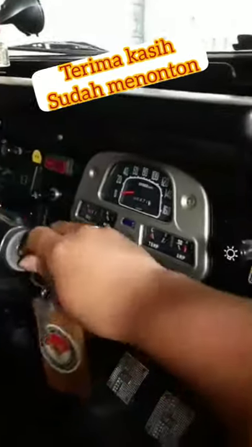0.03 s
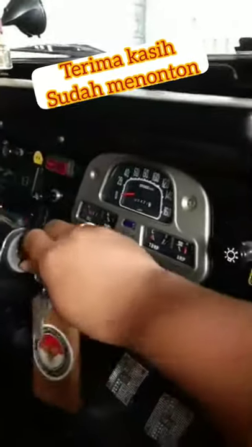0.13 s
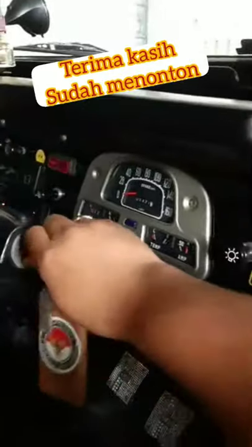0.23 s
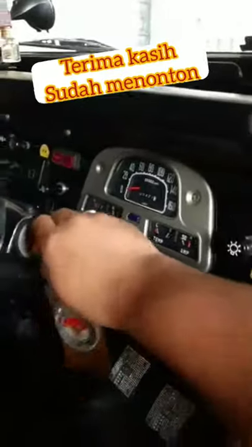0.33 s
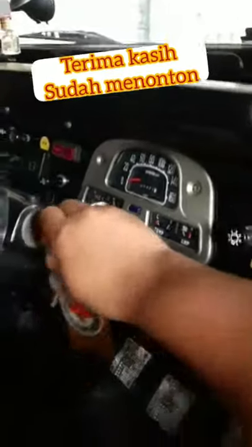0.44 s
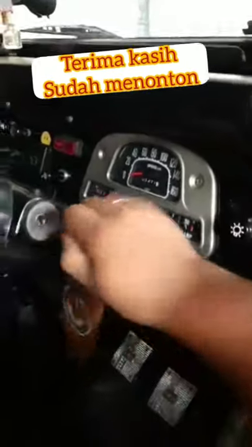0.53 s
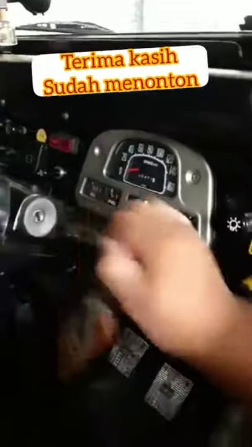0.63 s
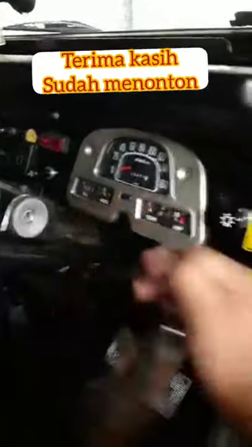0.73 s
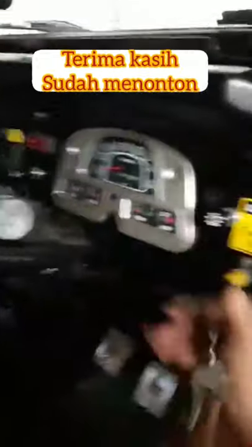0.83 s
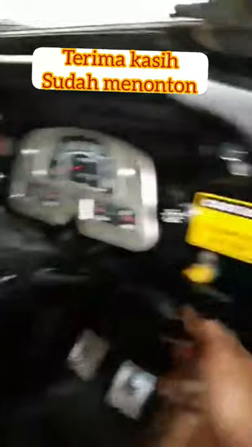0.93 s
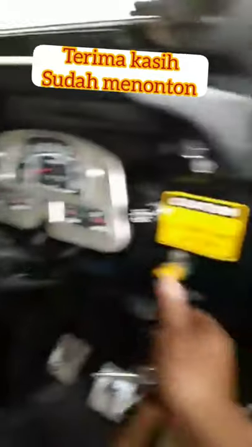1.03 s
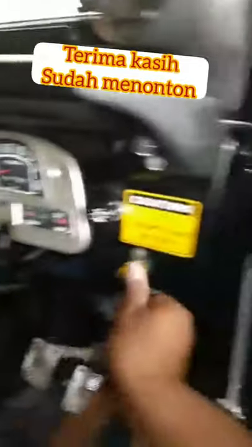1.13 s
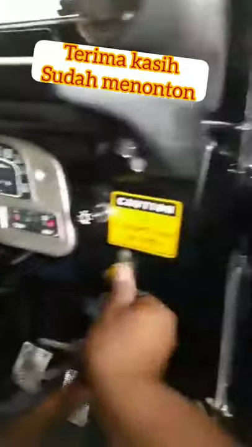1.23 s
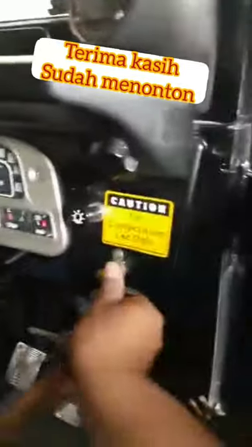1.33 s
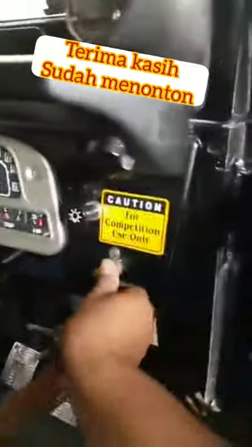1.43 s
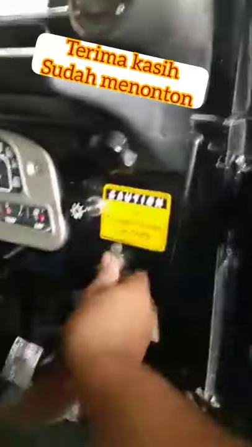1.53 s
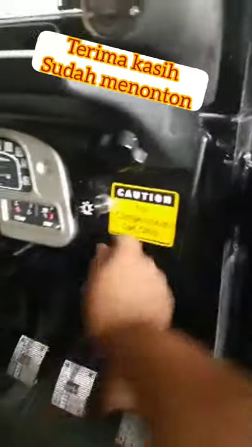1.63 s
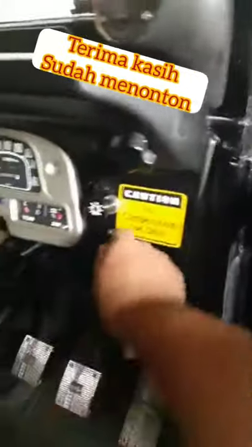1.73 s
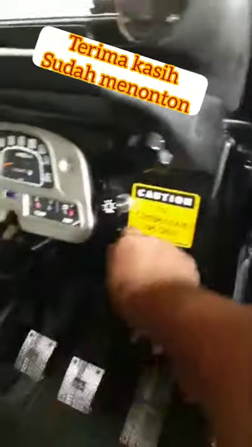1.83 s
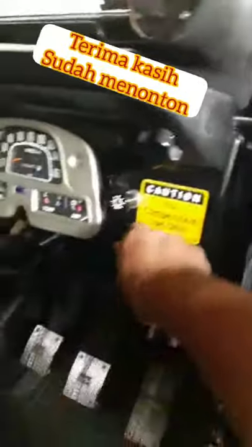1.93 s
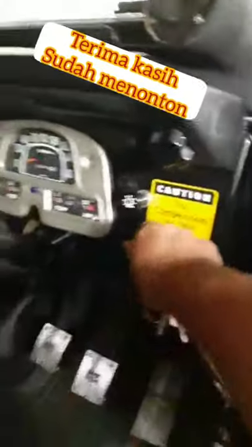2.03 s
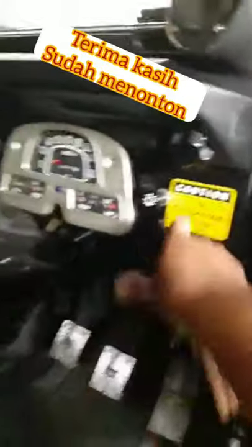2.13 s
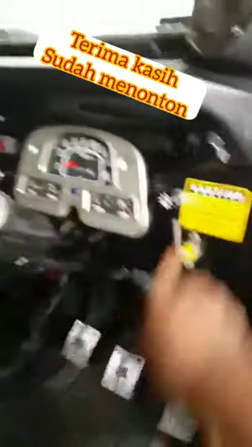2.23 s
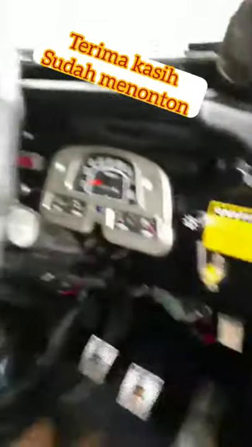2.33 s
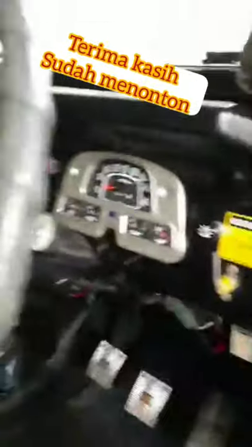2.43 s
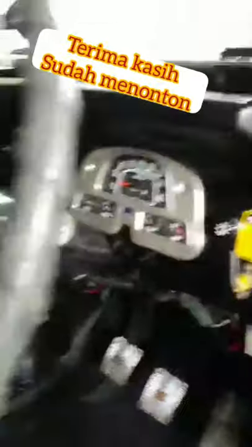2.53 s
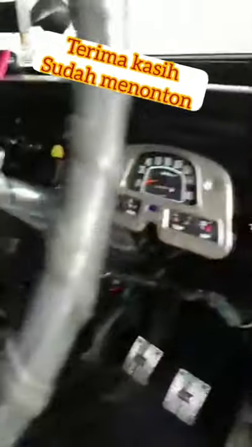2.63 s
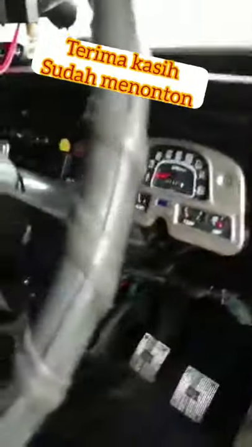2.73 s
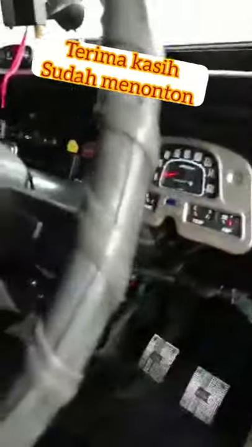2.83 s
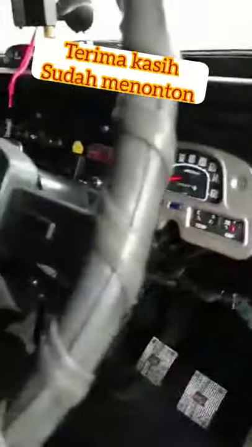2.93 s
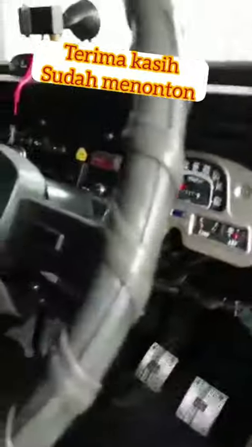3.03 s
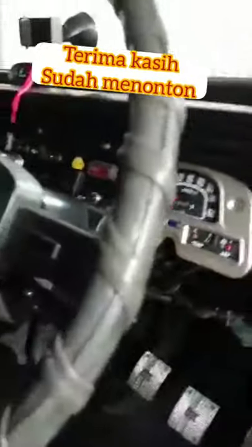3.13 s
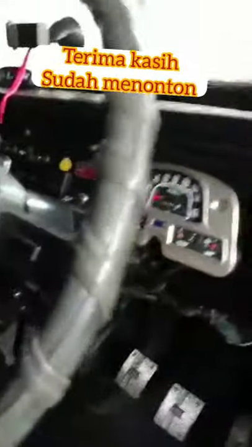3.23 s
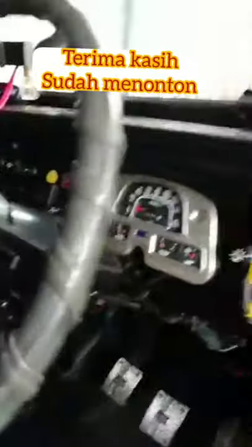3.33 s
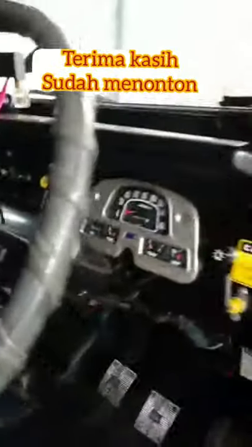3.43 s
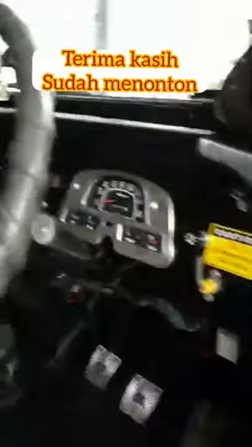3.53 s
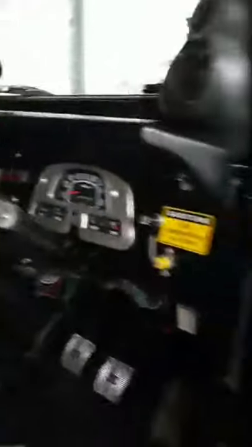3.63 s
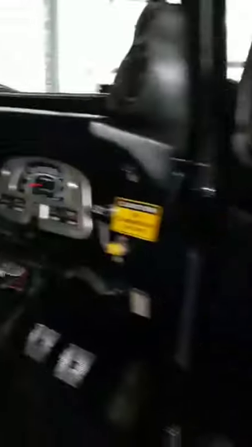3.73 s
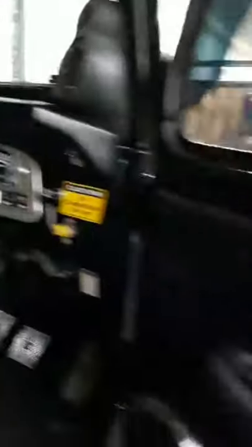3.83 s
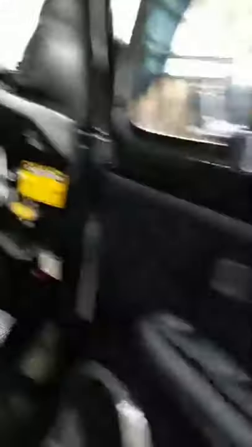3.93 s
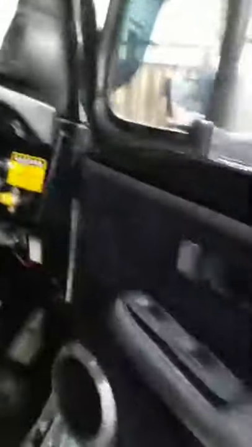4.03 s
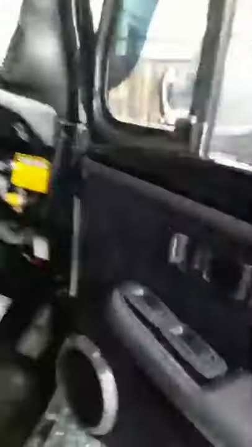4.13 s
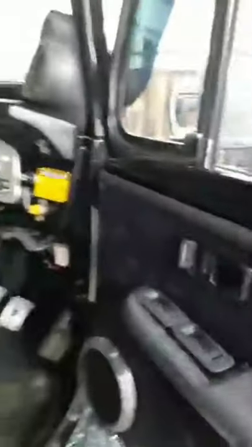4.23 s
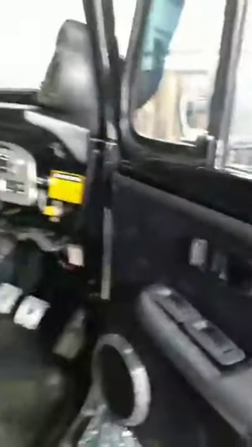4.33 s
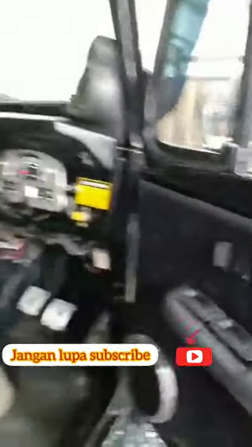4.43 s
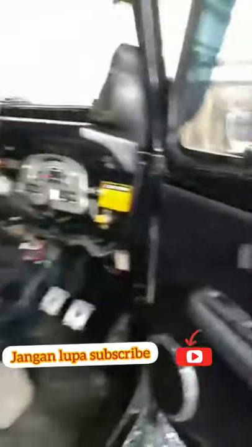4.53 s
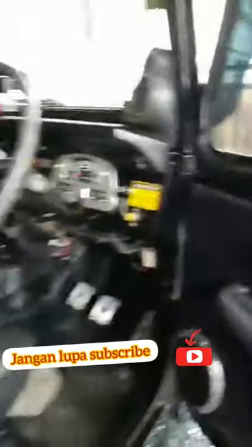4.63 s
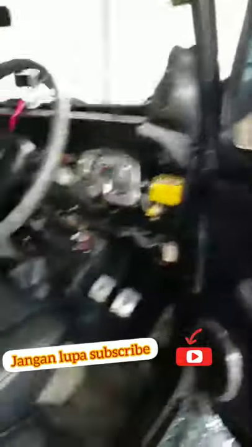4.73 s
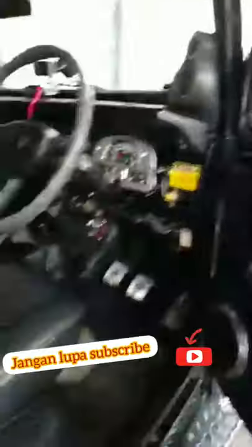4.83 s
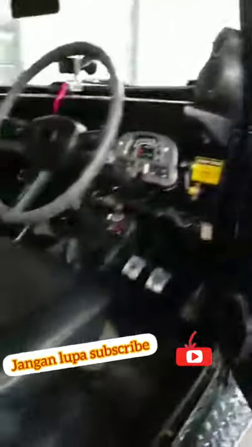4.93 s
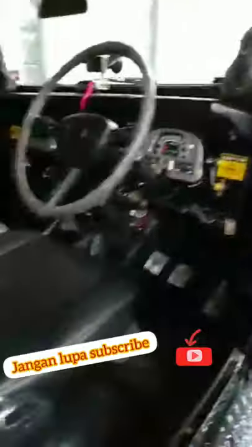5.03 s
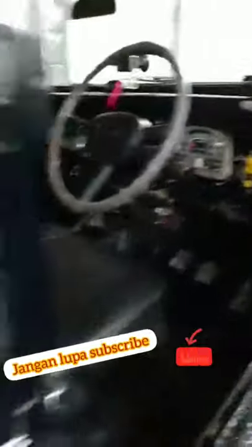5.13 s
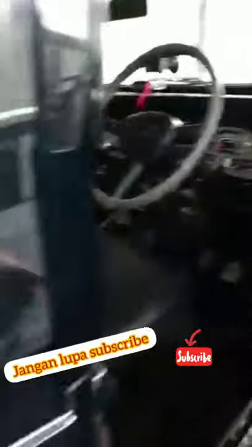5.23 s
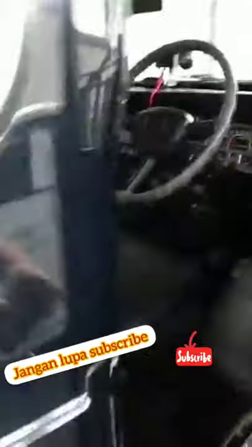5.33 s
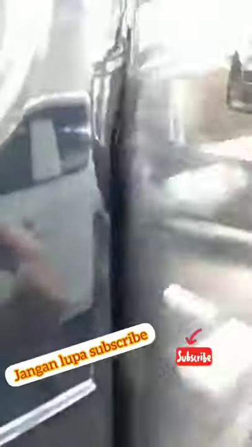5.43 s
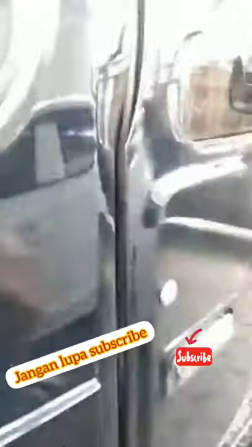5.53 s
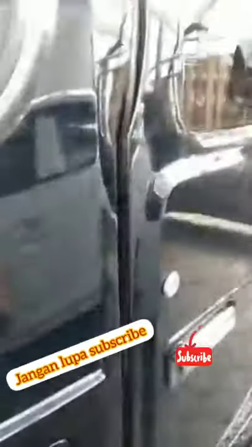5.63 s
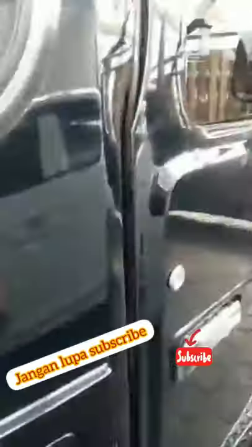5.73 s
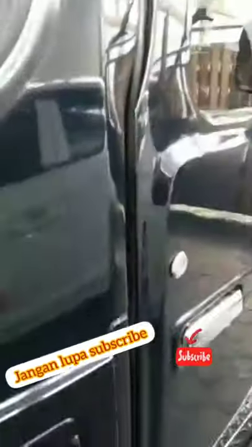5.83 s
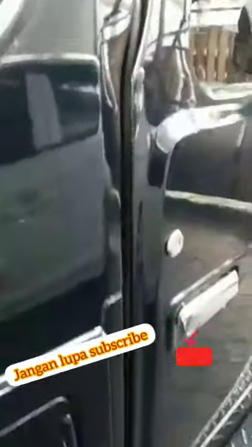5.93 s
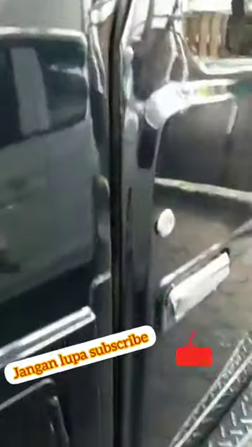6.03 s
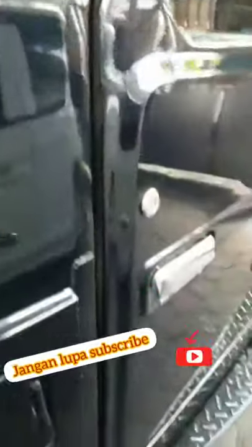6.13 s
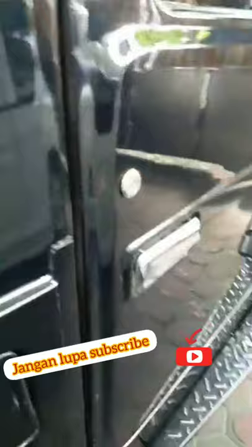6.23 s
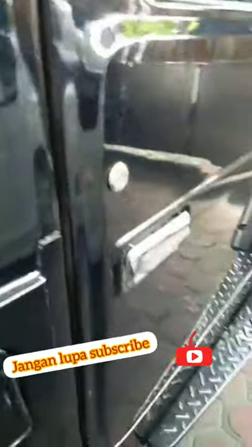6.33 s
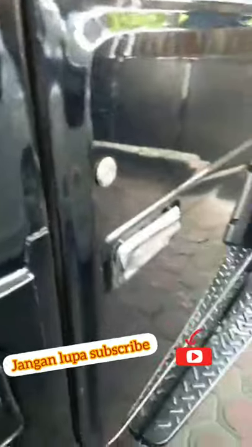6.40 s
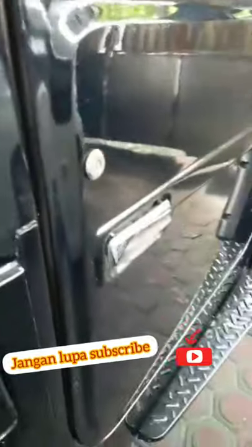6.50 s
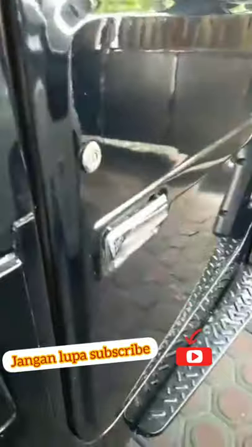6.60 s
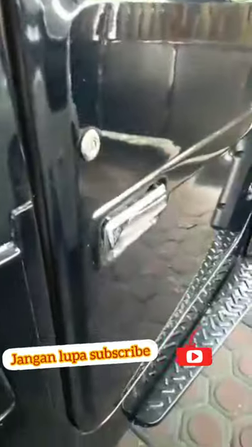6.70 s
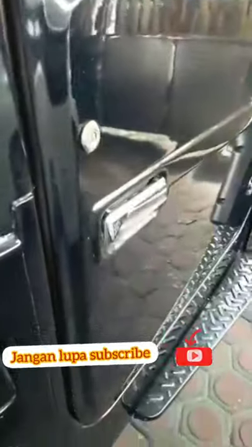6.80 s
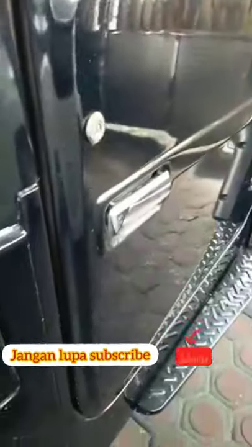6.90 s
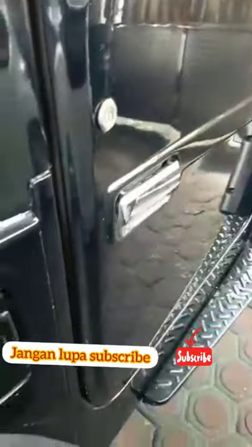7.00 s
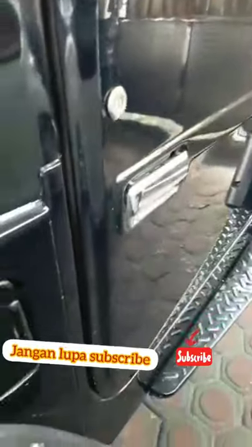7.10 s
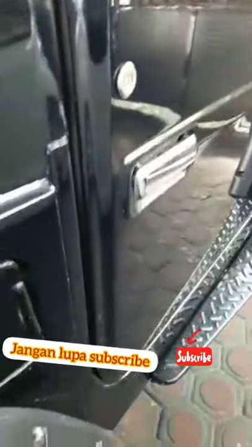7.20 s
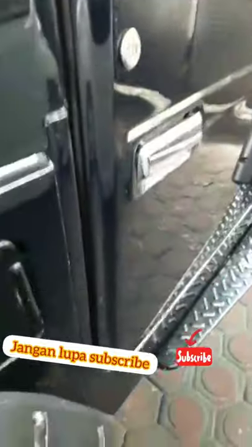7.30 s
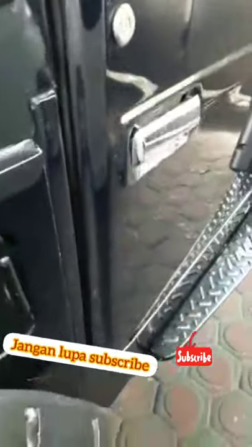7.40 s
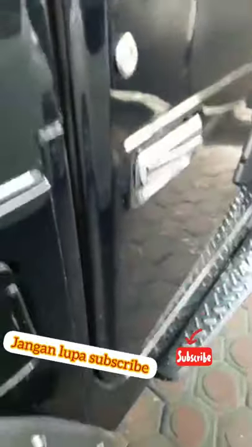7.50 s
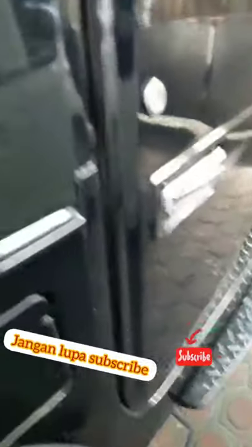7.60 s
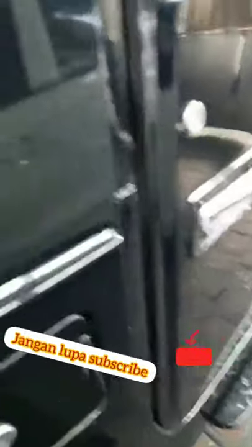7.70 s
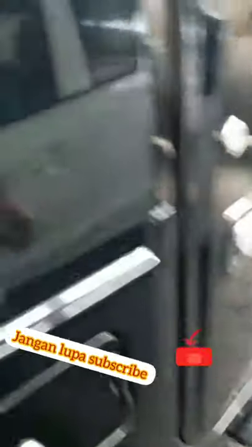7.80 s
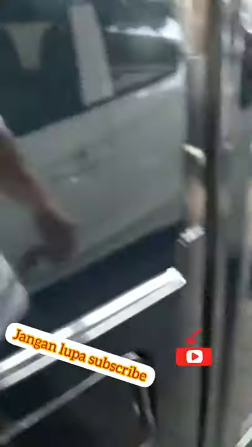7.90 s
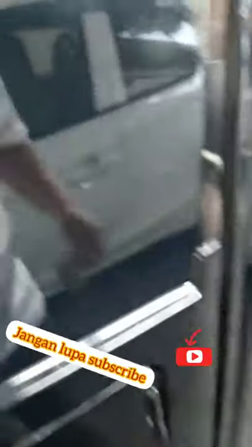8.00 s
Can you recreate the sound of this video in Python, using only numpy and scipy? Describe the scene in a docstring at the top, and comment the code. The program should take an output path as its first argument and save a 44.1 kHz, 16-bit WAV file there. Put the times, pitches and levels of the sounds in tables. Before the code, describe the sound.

A close mono microphone inside a parked off-road car, with low traffic rumble and soft street noise. From 0 to 1 s, keys chink faintly, knobs tick and a bird gives thin, echoing whistles. A switch snaps at 1.3 s; soft falling bird notes follow, then brighter whistles around 2.1 s. A far motor drone swells to about 3.1 s, holds briefly, then fades, sinking in pitch. Small catches click at 3.2-3.4 s as cloth rustles; a hard double snap comes at 3.9 s with keys jingling. Knocks, a short scrape and sharp clacks cluster at 4.5-4.8 s. At 5.4 s the steel door slams: bright strike, low boom, shuddering panel, metallic ring, with a scrape just before. Afterwards the background thins outdoors, with a very faint deep hum, light ticks and key chinks near 6.5 s, and two crisp, echoing latch clicks at 7.3 s, ending quietly at about 8 s.

```python
"""Catches, knobs and trim click inside a parked off-road car, and its steel door is slammed, ringing on.
These sounds are short bursts of shaped noise and fading tones. Keys at the ignition are fading sine waves.
Rubbing cloth, metal scrapes and traffic are shaped noise; a bird, a far motor and a deep hum are sine waves.
A carport under which the car stands adds echo. Table levels are relative: later settings shift most of them."""
import sys
import numpy as np
from scipy import signal
from scipy.fft import rfft, irfft, next_fast_len
from scipy.io import wavfile
from scipy.ndimage import uniform_filter1d, minimum_filter1d, map_coordinates

SR = 44100
rng = np.random.default_rng(int(sys.argv[2]) if len(sys.argv) > 2 else 0)


def inscribe(sig):
    """Save sig as 16-bit PCM at rate SR to the path in sys.argv[1].

    A 1-D sig is mono; a 2-D sig holds one channel per row.
    Samples are clipped to [-1, 1] before scaling.
    """
    pcm = np.round(np.clip(np.atleast_2d(sig).T, -1, 1) * 32767)
    wavfile.write(sys.argv[1], SR, pcm.astype(np.int16))


N = 355446  # length of the sound in samples

# movements of arm and body, felt in cloth and faint ticks: (middle t/s, length/s, level/dB)
MOVES = [(0.451, 0.15, -49.5), (1.35, 0.18, -49.5), (2.215, .35, -46.5), (3.358, 0.6, -43.5),
         (3.943, 0.5, -42.5), (4.519, 0.66, -41.5), (6.31, 0.54, -52.5), (7.368, 0.26, -47.5)]
# colour of a bright metal contact: (f/Hz, level/dB)
TICK = [(4000, -3), (6000, -12), (7400, -2), (9000, -13.5), (14000, -6.5)]


def amp(db):
    """Turn decibels into a gain."""
    return 10 ** (np.asarray(db) / 20)


def unit(x):
    """Scale to an average strength (rms) of 1."""
    return x / np.sqrt(np.mean(x ** 2) + 1e-20)


def along(points, hz):
    """Read (f/Hz, value) points at any frequency, with straight lines on a log frequency axis."""
    f, values = np.transpose(points)
    return np.interp(np.log(hz + 1), np.log(f), values)


def curves(rows):
    """Give one value per sample for each column after the time."""
    s, *columns = np.transpose(rows)
    now = np.arange(N) / SR
    return [np.interp(now, s, column) for column in columns]


def wobble(rate, size=N):
    """A smooth random curve with rate knots a second."""
    knots = rng.standard_normal(8192)
    return map_coordinates(knots, [np.arange(size) * rate / SR], mode="wrap")


def filtered(x, response):
    """Change the strength of each frequency in x by a response function."""
    m = next_fast_len(len(x) + 8192)
    spectrum = rfft(x, m) * response(np.fft.rfftfreq(m, 1 / SR))
    return irfft(spectrum, m)[:len(x)]


def noise(spectrum, size=N):
    """Coloured noise of rms 1 that falls away beyond the ends of its spectrum."""
    low_hz, high_hz = spectrum[0][0], spectrum[-1][0]

    def response(hz):
        skirts = 1 / (1 + (low_hz / (hz + 1)) ** 8) / (1 + (hz / high_hz) ** 8)
        return amp(along(spectrum, hz)) * skirts

    return unit(filtered(rng.standard_normal(size), response))


def band(centre_hz, octaves, size):
    """Noise of rms 1 in one hump around a centre frequency."""
    hump = lambda hz: np.exp(-(np.log2((hz + 1) / centre_hz) / octaves) ** 2)
    return unit(filtered(rng.standard_normal(size), hump))


def fade(t, t60):
    """Die away exponentially, by 60 dB in t60 seconds."""
    return np.exp(-np.log(1000) * t / np.maximum(t60, 1e-3))


def dying(x, t60s):
    """Let each frequency of x die away at its own speed."""
    hz, t, z = signal.stft(x, SR, nperseg=256)
    z = z * fade(t, along(t60s, hz)[:, None])
    return signal.istft(z, SR, nperseg=256)[1][:len(x)]


def add(track, s, sound):
    """Mix a sound into the track at s seconds."""
    part = track[max(round(s * SR), 0):][:len(sound)]
    part += sound[:len(part)]


def echo(x, build=0.0013):
    """The carport's blurred echo: noise that builds up in a moment, then dies at a speed set by pitch."""
    # echo of the carport: (f/Hz, time to fall 60 dB/s)
    carport = [(200, 0.18), (1200, 0.75), (3000, 0.67), (6000, 0.53), (13000, 0.55)]
    tail = dying(rng.standard_normal(SR), carport) * (1 - np.exp(-np.arange(SR) / SR / build))
    return signal.fftconvolve(x, tail / np.linalg.norm(tail))


def clicks(latch_db=-11, bump_db=-11.5, trim_db=-9.5, count=3):
    """Catches snap, panels are bumped and trim ticks as someone handles the controls and climbs out."""
    # catches of switches, handle and latch:
    # (t/s, level/dB, snap/dB, panel knock/dB, clack/dB, time to fall 60 dB/s)
    latches = [(1.261, -10.5, -8, -15, -15, 0.12), (3.199, -14.5, -9, -31, -24, 0.097),
               (3.253, -13.5, -4, -26, -14, 0.055), (3.381, -12.5, -3.5, -23, -23, 0.051),
               (3.878, -1.5, 0, -14, -18, 0.069), (3.886, -4, -3, -15, -12.5, 0.095),
               (3.908, -6.5, -10, -10, -16, 0.038), (4.139, -20.5, -13, -17, -12, 0.079),
               (4.481, -7.5, -7, -11, -29, 0.072), (4.675, -9.5, -5, -10.5, -35, 0.043),
               (4.713, -8, 13, -17, -11, 0.09), (4.757, -11, -13, -12.5, -7, 0.069),
               (7.24, -6, -12, -25.5, -16.5, 0.064), (7.286, -16, 6.5, -23, -1.5, 0.047)]
    # dull knocks on dashboard and door trim: (t/s, level/dB, clack f/Hz, panel knock/dB)
    bumps = [(1.048, -25, 1140, -7), (2.021, -22, 1480, 3), (4.458, -15, 1000, -3), (4.465, -25, 1340, 7),
             (4.634, -29.5, 2000, -23)]
    # light ticks of knobs and trim: (t/s, level/dB, bright ring/dB)
    trim = [(0.401, -30, -5), (0.443, -32, 0), (0.537, -30.5, -1.5), (0.896, -26, -3), (2.427, -28, -10),
            (2.667, -35, 8.5), (2.928, -29.5, -2), (2.998, -34, 5), (3.741, -25.5, -3.5), (4.295, -20, -4),
            (4.974, -25, -4), (5.106, -23.5, -12.5), (5.905, -30, -12), (6.05, -31, -8),
            (6.149, -32.5, 0.5), (6.45, -31.5, -11), (6.527, -26.5, -6), (6.931, -32.5, -10)]
    out = np.zeros(N)
    for s, db, snap, knock, clack, t60 in latches:
        sound = click(snap, knock, clack, clack_hz=1460, tick=-11.5, t60=t60)
        add(out, s, amp(db + latch_db) * sound)
    for s, db, clack_hz, knock in bumps:
        sound = click(snap=-4, knock=knock, clack=7, clack_hz=clack_hz, tick=-4.5, t60=0.061)
        add(out, s, amp(db + bump_db) * sound)

    # fainter ticks fall at random around each movement and follow its level
    faint = []
    for s, length, db in MOVES:
        for _ in range(count):
            tick_s = s + length * rng.uniform(-1, 1)
            tick_db = db + 12.5 + rng.standard_normal()
            faint.append((tick_s, tick_db, 0))
    for s, db, bright in trim + faint:
        sound = click(snap=-6, knock=-16.5, clack=-11, clack_hz=1500, tick=bright, t60=0.076)
        add(out, s, amp(db + trim_db) * sound)
    return out


def click(snap, knock, clack, clack_hz, tick, t60, snap_db=6.0, catch_db=-4, clack_octaves=0.87,
          panel_hold=1.58, give=0.00174, rattle_db=3):
    """A part gives, snaps home and rattles briefly; the panel behind it knocks a little longer."""
    # small steel catches: (f/Hz, level/dB)
    catch_colour = [(1500, -5), (2500, -4), (3400, -6), (4250, 3.5), (5200, -5), (7000, -11)]
    # the panel behind them: (f/Hz, level/dB)
    knock_colour = [(60, -30), (160, -0.5), (400, -4.5), (700, -6.5), (1200, -34)]
    t = np.arange(SR // 4) / SR
    steel = amp(catch_db) * noise(catch_colour, len(t)) + amp(tick) * noise(TICK, len(t))
    panel = amp(knock) * noise(knock_colour, len(t)) + amp(clack) * band(clack_hz, clack_octaves, len(t))
    rattle = fade(t, t60) * amp(rattle_db * wobble(205, len(t)))
    # the crack of the snap peaks "give" seconds after the start
    crack = amp(snap + snap_db) * fade(np.abs(t - give), 0.003)
    onset = np.minimum(1, t / give) ** 2
    return (steel * (rattle + crack) + panel * (fade(t, t60 * panel_hold) + crack / 2)) * onset


def door(strike_db=-10, strike_t60=0.032, skin_db=-5, boom_db=-5, boom_t60=0.38, swell=0.0015, rattle_db=2):
    """The latch strikes, the door lands on its seal and shudders; the latch spring sings on."""
    # latch, seal, then the panel shudders: (t/s, clash level/dB, boom level/dB)
    slam_hits = [(5.424, -16.5, -44), (5.434, -16.5, -12.5), (5.456, -22.5, -38), (5.469, -17.5, -20),
                 (5.497, -24.5, -22)]
    # tones of door skin and cabin: (f/Hz, level/dB, time to fall 60 dB/s)
    skin_tones = [(90, -17, .3), (131, -3, .36), (172, -4, .45), (242, -11, .35), (272, -3, .38),
                  (336, -4, .38), (410, -5, .33), (451, -6, .33), (567, -11, .3)]
    # boom of the cabin air: (f/Hz, level/dB)
    air_colour = [(25, -12), (45, -3), (90, -5), (170, 7.5), (400, -4.5), (700, -20)]
    # clash of metal: (f/Hz, level/dB), and how it dies: (f/Hz, time to fall 60 dB/s)
    clash_colour = [(59, -25), (100, -1), (328, -8), (364, -19), (457, -7.5), (693, -13.5), (1630, -11),
                    (2010, -13.5), (3520, -18.5), (3820, -14), (6170, -23), (7140, -18), (8440, -29),
                    (14500, -22)]
    clash_t60 = [(150, 0.51), (600, 0.43), (2000, 0.39), (6000, 0.42), (13000, 0.29)]
    # latch spring: (f/Hz, level/dB, time to fall 60 dB/s)
    spring_tones = [(13313, -37, .6), (14063, -37, .9)]
    out, t = np.zeros(N), np.arange(SR * 2) / SR
    for s, clash_db, db in slam_hits:
        skin = np.zeros(len(t))
        for hz, level, t60 in skin_tones:
            skin += amp(level) * np.sin(2 * np.pi * (hz * t + rng.random())) * fade(t, t60)
        air = noise(air_colour, len(t)) * fade(t, boom_t60)
        boom = (amp(skin_db) * skin + amp(boom_db) * air) * (1 - np.exp(-t / swell))
        add(out, s, amp(db) * boom)
        clash = dying(noise(clash_colour, len(t)), clash_t60)
        add(out, s, amp(clash_db + rattle_db * wobble(179.0, len(t))) * clash)
    contact = unit(noise(TICK, len(t)) + 0.56 * band(2100, 0.45, len(t)))
    strike = amp(strike_db) * contact * fade(t, strike_t60)
    spring = sum(amp(db) * np.sin(2 * np.pi * hz * t) * fade(t, t60) for hz, db, t60 in spring_tones)
    add(out, slam_hits[0][0], strike + spring)
    return out


def keys(level_db=-17, scatter_db=3, main_db=11, scrape_db=-1, sizzle_db=0, scrape_t60=0.062,
         contact=0.00078, ring_hold=1.83):
    """Keys swing against each other; where they touch decides which of their tones rings most."""
    # chinks: (t/s, level/dB, strongest tone f/Hz, boost of high tones/dB)
    chinks = [(.122, -35, 7830, -8), (0.761, -29.5, 14000, -8), (0.811, -21.5, 7830, -8),
              (.828, -29, 7830, -10), (0.839, -22.5, 14060, 1), (3.193, -26, 12600, -4),
              (3.969, -19.5, 12290, 0), (3.980, -14.5, 8530, -1), (4.635, -27.5, 9200, 0),
              (5.098, -28, 12650, -1), (6.514, -33, 13300, 6), (6.525, -26, 8830, 2),
              (6.537, -36, 8950, -8), (7.309, -28.5, 9300, 6), (7.345, -24, 11800, 3)]
    # a key's tones: (f/Hz, level/dB, time to fall 60 dB/s before ring_hold stretches it)
    brass = [(4450, -10, .05), (6360, -12, .07), (7180, -6, .06), (7830, 0, .07), (8950, -2, .08),
             (9200, -8, .09), (10750, -14, .05), (11820, -6, .05), (12290, -7, .1), (12600, -8, .1),
             (13300, -8, .06), (14060, -9, .13)]
    out, t = np.zeros(N), np.arange(SR // 4) / SR
    hz, mode_db, t60 = np.transpose(brass)[:, :, None]
    for s, db, main_hz, high_db in chinks:
        strength, detune, phase = rng.standard_normal((3, len(brass), 1))
        colour_db = high_db * (hz > 11000) + main_db * np.exp(-((hz - main_hz) / 300) ** 2)
        # neighbouring keys keep brushing the one that rings, so its tones chatter
        chatter = np.array([wobble(200, len(t)) for _ in brass])
        tones = np.sin(2 * np.pi * (hz * (1 + 0.0044 * detune) * t + phase) + 0.5 * chatter)
        tone_db = mode_db + colour_db + scatter_db * strength + 2 * chatter
        ring = (amp(tone_db) * tones * fade(t, t60 * ring_hold)).sum(0)
        scrape = amp(scrape_db) * noise(TICK, len(t))
        scrape += amp(sizzle_db + high_db) * band(11050, 0.064, len(t))
        onset = 1 - np.exp(-t / contact)
        add(out, s, amp(db + level_db) * (ring + scrape * fade(t, scrape_t60)) * onset)
    return out


def slides(octaves=0.67, stick_db=4.0):
    """Cloth catches and slips as it is drawn over the seat, heard as uneven swells of noise."""
    # longer slides: (t/s, length/s, centre f/Hz, level/dB)
    strokes = [(3.113, 0.052, 4770, -42.5), (3.452, 0.11, 5040, -38.5), (3.645, 0.062, 5070, -45.5),
               (3.766, 0.13, 2020, -39), (4.235, 0.17, 5000, -41), (5.272, 0.16, 5400, -39.5)]
    out = np.zeros(N)
    for s, length, centre_hz, db in strokes:
        n = int(length * SR)
        swell = np.sin(np.linspace(0, np.pi, n))
        add(out, s, amp(db + stick_db * wobble(150, n)) * swell * band(centre_hz, octaves, n))
    return out


def cloth(level_db=1, grain_rate=90, grain_db=-9):
    """Sleeve and seat rub, swelling with each movement, with tiny creaks scattered through the hiss."""
    # colour of rustling cloth: (f/Hz, level/dB)
    rustle = [(880, -27), (1500, -8), (1920, 0.5), (3490, -7), (4220, 1.5), (5670, -7.5), (7120, -4.5),
              (8600, -14), (13600, -11), (14500, -26)]
    now, t = np.arange(N) / SR, np.arange(SR // 50) / SR
    # the faint rub between movements drops at 5.94 s
    power = amp(np.where(now > 5.94, -58, -51.5)) ** 2
    for s, length, db in MOVES:
        power = power + (amp(db) * np.exp(-(2 * (now - s) / length) ** 2)) ** 2
    # grain_rate creaks a second on average, each of random strength
    slips = (rng.random(N) < grain_rate / SR) * rng.random(N)
    grains = signal.fftconvolve(slips, rng.standard_normal(len(t)) * fade(t, 0.018))[:N]
    grains = unit(filtered(grains, lambda hz: amp(along(rustle, hz))))
    stroke = amp(0.7 * wobble(40))
    return amp(level_db) * np.sqrt(power) * stroke * (noise(rustle) + amp(grain_db) * grains)


def scrapes(ring_octaves=0.11, grit_hz=3250, bite_t60=0.08, tail_db=-5, tail_t60=0.64, attack=0.0015,
            judder_db=2):
    """Metal bites and judders; a slower second fade lets its narrow ring and broad grit hang on."""
    # short metallic scrapes: (t/s, level/dB, ring f/Hz, grit level/dB, grit width/octaves)
    bites = [(4.476, -25, 4870, -7, 1.2), (5.329, -23, 4440, -4.5, 1.14), (6.271, -39, 3050, 4, 0.77)]
    out, t = np.zeros(N), np.arange(SR * 3 // 4) / SR
    shape = fade(t, bite_t60) + amp(tail_db) * fade(t, tail_t60)
    shape *= 1 - np.exp(-t / attack)
    for s, db, ring_hz, grit_db, grit_octaves in bites:
        metal = band(ring_hz, ring_octaves, len(t)) + amp(grit_db) * band(grit_hz, grit_octaves, len(t))
        add(out, s, amp(db + judder_db * wobble(200, len(t))) * shape * metal)
    return out


def bird(count=4):
    """A phrase of whistles and rasps, with an even run of soft falling notes in its middle."""
    # louder calls: (t/s, length/s, start f/Hz, end f/Hz, level/dB, rasp 0-1)
    calls = [(0, 0.012, 2704, 2730, -31.5, 0.02), (0, 0.022, 3590, 3340, -39.5, 0.3),
             (0.095, 0.17, 2143, 2165, -35, 0.14), (.336, 0.17, 2017, 1237, -40, .7),
             (0.556, 0.14, 1704, 1824, -28.5, 0.11), (0.745, 0.029, 2483, 2633, -38, 0.26),
             (0.879, 0.047, 2300, 2593, -27.5, 0.65), (.881, 0.0217, 3166, 2860, -29.5, 0.3),
             (0.914, 0.079, 3700, 3655, -20.5, 0.36), (0.966, 0.093, 2819, 2737, -18.5, 0.07),
             (0.991, 0.09, 1382, 1242, -44, 0.29), (1.131, .18, 1232, 1580, -37.5, 0.46),
             (2.08, 0.0696, 2593, 2856, -24, 0.57), (2.11, 0.061, 3017, 3090, -21, 0.31),
             (2.164, 0.053, 3042, 2920, -15, 0.27), (2.147, .07, 2610, 2215, -32.5, 0.8)]
    # the repeated soft note: (length/s, start f/Hz, end f/Hz, level/dB, rasp 0-1)
    soft_note = (0.06, 1186, 1002, -45.5, 0.6)
    soft_start_s, soft_gap_s = 1.388, 0.148
    out = np.zeros(N)
    for s, *shape in calls:
        add(out, s, note(*shape))
    for k in range(count):
        add(out, soft_start_s + k * soft_gap_s, note(*soft_note))
    return out


def note(length, start_hz, end_hz, db, rasp, rasp_depth=0.156, rasp_rate=900, overtone_db=-28, hiss_db=-16,
         direct_db=-5):
    """One gliding whistle, more or less torn by fast pitch flutter, heard mostly through its echo."""
    u = np.linspace(0, 1, int(length * SR))
    flutter = 1 + rasp_depth * rasp * wobble(rasp_rate, len(u))
    hz = (start_hz + (end_hz - start_hz) * u) * flutter
    phase = 2 * np.pi * np.cumsum(hz) / SR
    hiss = amp(hiss_db) * np.sqrt(abs(rasp)) * band(start_hz * 1.07, 0.75, len(u))
    whistle = np.sin(phase) + amp(overtone_db) * np.sin(2 * phase) + hiss
    whistle *= signal.windows.tukey(len(u), 0.3)
    heard = echo(whistle)
    add(heard, 0, amp(direct_db) * whistle)
    # db sets the loudest short stretch of whistle and echo together
    loudest = np.sqrt(uniform_filter1d(heard ** 2, size=1300).max())
    return amp(db) * heard / loudest


def motor(hold_s=0.41, waver=0.0044, flutter_db=1.5):
    """A far motor's drone swells, holds, fades and sinks in pitch as it passes."""
    peak_s, peak_db, peak_hz = 3.13, -38.5, 212
    rise_db_per_s, fall_db_per_s, sag_hz_per_s = 27.5, 18, 10.5
    t = np.arange(N) / SR - peak_s
    hz = (peak_hz - sag_hz_per_s * t) * (1 + waver * wobble(20))
    db = peak_db + rise_db_per_s * np.minimum(t, 0) - fall_db_per_s * np.maximum(t - hold_s, 0)
    drone = unit(np.sin(2 * np.pi * np.cumsum(hz) / SR))
    return amp(db + flutter_db * wobble(9.7)) * drone


def deep_hum():
    """A faint, low, steady tone fades in around the slam, lingers and fades out."""
    # one hum: (start t/s, length/s, f/Hz, level/dB)
    hum = (5.3, 2.2, 49, -64.5)
    s, length, hz, db = hum
    out, t = np.zeros(N), np.arange(int(length * SR)) / SR
    add(out, s, amp(db) * np.sin(2 * np.pi * hz * t) * signal.windows.tukey(len(t), 0.5))
    return out


def street(rumble_db=2, street_db=5, drift_db=1):
    """Traffic rumble fills the cabin and thins out in the open, over a higher street noise."""
    # the background as the microphone leaves the cabin: (t/s, rumble level/dB, street level/dB)
    air_levels = [(0, -49.5, -49), (3.7, -46.5, -48.5), (4.4, -53.5, -51.5), (5.5, -46, -52.5),
                  (6.05, -55.5, -59.5), (7.7, -58, -61.5), (8.06, -52, -54.5)]
    # colour of the rumble: (f/Hz, level/dB)
    rumble_colour = [(15, -55), (25, -14), (49, -16), (66, 2.5), (81, 6), (134, 6.5), (200, 2), (254, -0.5),
                     (288, -8.5), (500, -21.5), (650, -4), (1100, -120)]
    # colour of the street noise: (f/Hz, level/dB)
    street_colour = [(150, -44), (250, -1.5), (383, -0.5), (426, -2), (754, -5.5), (827, -5.5),
                     (1550, -6.5), (2630, -4.5), (6000, -28.5), (7800, -55.5), (13200, -120)]
    low_db, mid_db = curves(air_levels)
    rumble = amp(low_db + rumble_db + drift_db * wobble(6.2)) * noise(rumble_colour)
    return rumble + amp(mid_db + street_db) * noise(street_colour)


def scene(inside_wet_db=-15, outside_wet_db=-6, door_wet_db=-20, dull_hz=4500):
    """Clicks have little echo in the cabin and gain more, dulled, as the microphone goes outside."""
    small, slam = clicks(), door()
    # the echo of the clicks grows from 4.5 s to 6 s
    wet_db = np.interp(np.arange(N) / SR, [4.5, 6], [inside_wet_db, outside_wet_db])
    room = echo(small * amp(wet_db) + slam * amp(door_wet_db))[:N]
    room = filtered(room, lambda hz: 1 / (1 + 1j * hz / dull_hz))
    handling = small + slam + room + keys() + slides() + cloth() + scrapes()
    background = bird() + motor() + deep_hum() + street()
    mono = handling + background
    return np.array([mono, mono])


def record(dry, ceiling=0.79, top_hz=14450):
    """A mono microphone with a fast peak limiter, then a cut of everything above the top frequency."""
    needed = np.minimum(1, ceiling / (np.abs(dry[0]) + 1e-9))
    # hold the lowest gain for about 3 ms and smooth it
    gain = uniform_filter1d(minimum_filter1d(needed, size=130), size=130)
    mono = filtered(dry[0] * gain, lambda hz: np.clip((top_hz - hz) / 300 + 0.5, 0, 1))
    return np.array([mono, mono])


dry = scene()
out = record(dry)
inscribe(out)
```